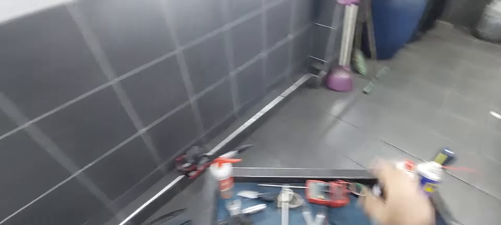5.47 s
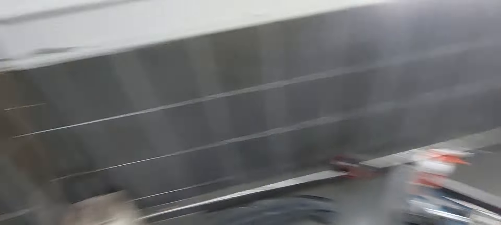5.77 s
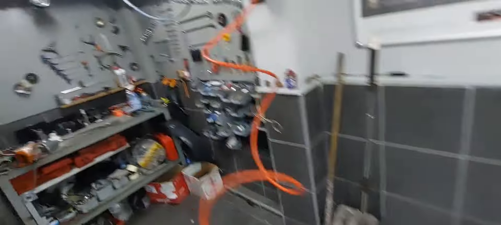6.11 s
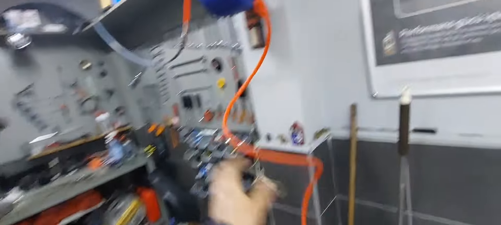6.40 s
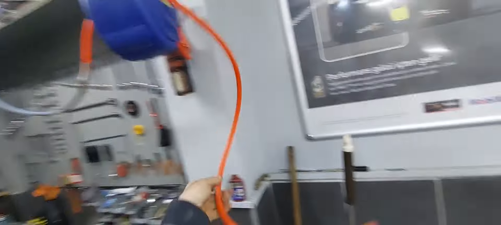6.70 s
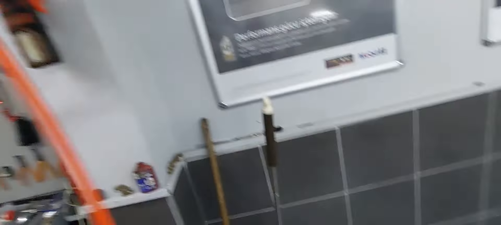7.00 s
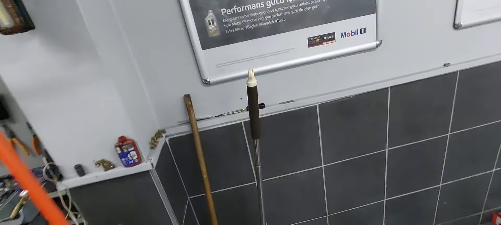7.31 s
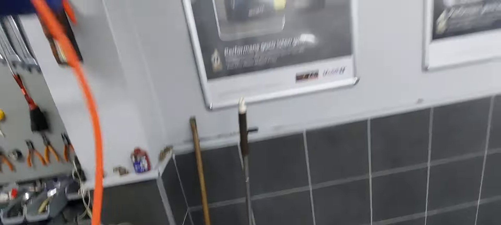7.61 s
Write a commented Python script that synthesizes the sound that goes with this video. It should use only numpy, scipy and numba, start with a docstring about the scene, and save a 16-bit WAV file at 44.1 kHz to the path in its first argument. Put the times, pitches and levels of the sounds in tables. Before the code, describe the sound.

Two loud blasts of compressed air in a workshop, followed by a hollow clank, hose bumps and a clattering hose reel.

```python
"""A loud hiss of air comes first: a blow gun sweeps an engine bay in two long blasts, close to a
hand-held microphone in a tiled workshop. The jet roars on the parts it hits, whistles past their
edges and makes their hollows sing. Then the gun drops on a tool trolley with a boom and a clank,
the air hose slides and knocks, and a wall reel winds it in with a clattering ratchet.
Underneath are a faint machine hum and the rumble of the microphone being carried."""
import sys
import numpy as np
from scipy import signal
from scipy.fft import rfft, irfft
from scipy.io import wavfile
from scipy.ndimage import uniform_filter1d
from numba import njit

SR = 44100
rng = np.random.default_rng(int(sys.argv[2]) if len(sys.argv) > 2 else 0)


def unload_audio(sound):
    """Save the sound as a 16-bit wav file, at the path given as the first command line argument."""
    columns = np.transpose(np.atleast_2d(sound))
    # keep every value between -1 and 1, then stretch to whole-number steps
    steps = np.round(np.clip(columns, -1, 1) * 32767)
    wavfile.write(sys.argv[1], SR, steps.astype(np.int16))


N = 346185
TIME = np.arange(N) / SR
FREQ = np.maximum(np.arange(N // 2 + 1) * SR / N, 1)

# how long the room's echo takes to fall by 60 dB: pitch_hz, fade_s
ECHO_FADE = [(100, 0.61), (300, 0.76), (1000, 0.57), (2500, 0.65), (4500, 0.59), (6500, 0.51), (9000, 0.48),
             (14000, .33)]
# tone of the quiet room air: pitch_hz, level_db
ROOM_AIR_TONE = [(15, -38), (25, -3.5), (59, 2), (87, -10), (120, -4), (145, -13.5), (384, -33.5),
                 (840, -39), (3340, -41), (5730, -33.5), (7710, -45.5), (11000, -38), (16000, -47)]
# machine hum: pitch_hz, level_db
MACHINE_HUM = [(59.2, -78), (118.4, -84), (177.6, -99)]
# tone of a faint hiss, perhaps air seeping from the coupling: pitch_hz, level_db
SEEP_TONE = [(300, -8), (900, -4.5), (1500, -7), (2150, -4), (3000, -9.5), (4700, -2.5), (6300, -4.5),
             (8000, -19.5), (11500, -14.5), (16000, -21.5)]
# loudness of that faint hiss: time_s, level_db
SEEP_LEVELS = [(3.95, -89.5), (4.15, -78), (4.3, -82), (4.8, -78.5), (5.15, -71), (7.85, -71.5)]
# tone of the moving microphone's rumble: pitch_hz, level_db
RUMBLE_TONE = [(15, -20.5), (33, -11.5), (47, 6), (65, -2.5), (100, -11), (250, -19), (600, -43),
               (3000, -92)]
# loudness of that rumble: time_s, level_db
RUMBLE_LEVELS = [(4.65, -81.5), (4.93, -62), (5.29, -53), (5.35, -43), (5.54, -63), (5.75, -39),
                 (5.92, -40.5), (6.2, -55), (6.9, -50), (7.15, -41.5), (7.85, -41)]
# soft bumps of the hand on the microphone: start_s, level_db
HAND_BUMPS = [(5.618, -33), (5.711, -20), (5.789, -33), (5.887, -28)]

# tone of the sliding hose: pitch_hz, level_db
HOSE_TONE = [(120, -1), (200, -4), (380, 1), (409, -3), (473, 6), (1040, -5), (2290, 1.5), (2470, -3.5),
             (5730, -2), (7830, -19.5), (11900, -11), (16000, -18)]
# slides of the hose: start_s, length_s, level_db
HOSE_SLIDES = [(5.693, 0.13, -56.5), (5.876, 0.041, -59), (6.238, 0.14, -51), (6.72, 0.14, -44),
               (6.96, 0.034, -41.5), (7.03, 0.019, -53), (7.08, 0.045, -57), (7.5, .15, -55)]
# knocks of hose and coupling: start_s, body_db, clack_db, tick_db
HOSE_KNOCKS = [(4.754, -59, -75, -95), (4.842, -47, -54.5, -67), (5.895, -50, -51, -55),
               (5.929, -45, -47, -42.5), (6.259, -26.5, -40.5, -58), (6.658, -49, -68, -67),
               (6.724, -40.5, -69, -73), (6.912, -32, -54, -43), (6.997, -31, -42, -42),
               (7.003, -20, -59, -47), (7.043, -34, -38, -39.5)]
# tone of the pawl, the catch that snaps over the ratchet's teeth: pitch_hz, level_db
PAWL_TONE = [(100, -30), (190, -21), (270, 7.5), (360, 2.5), (470, -12), (620, 7), (1000, -4), (2200, -4.5),
             (3500, -9.5), (6300, -5.5), (7800, -21), (10000, -16), (13000, -13), (16000, -26)]
# tone of the reel's scraping drum: pitch_hz, level_db
DRUM_TONE = [(100, -16), (180, -3.5), (280, 1.5), (450, 4), (650, -1), (1000, 0.5), (1600, 1.5),
             (2700, -2.5), (3800, -7), (5300, -6.5), (6600, -10.5), (8000, -20.5), (13000, -26),
             (16000, -28)]
# spins of the reel: start_s, length_s, start_teeth_per_s, speedup_teeth_per_s2, pawl_db, drum_db
REEL_SPINS = [(7.152, 0.16, 24.6, 468, -6.5, -34.5), (7.667, .2, 28, 90, -16.5, -23.5)]
# ringing notes of the trolley top and the gun's metal: pitch_hz, level_db, fade_s
TROLLEY_NOTES = [(134.2, -1.5, 0.5), (168.7, -3, 0.58), (318, -20, 1.5), (393, -1.5, 0.52),
                 (610, -9.5, 0.37), (2170, -39, 1.4), (2350, -42.5, 0.82), (3020, -18.5, 0.23),
                 (3100, -31, 0.75), (3300, -28, 0.32), (3940, -33.5, 0.83), (4200, -31, 0.37),
                 (5173, -43.5, 0.59), (6500, -20.5, 0.12)]
# tone of the gun's clank: pitch_hz, level_db
CLANK_TONE = [(300, -2), (700, 10), (1100, 1.5), (1500, -3), (3000, -6.5), (5000, -8.5), (6600, -12),
              (7400, -36), (9500, -39.5), (13000, -23.5), (16000, -32)]

# squeezes of the trigger: pressed_s, released_s
TRIGGER_PULLS = [(-.015, 2.218), (2.609, 3.492)]
# force of the jet, one list per blast: time_s, nozzle_hiss_db, edge_hiss_db
JET_LEVELS = [
    [(0.01, -24.5, -26.5), (0.04, -21.5, -22), (0.5, -24.5, -25.5), (0.85, -23.5, -26), (0.95, -28, -33.5),
     (1.04, -25, -25.5), (1.12, -25.5, -31.5), (1.18, -22, -23), (1.45, -22.5, -23.5), (1.51, -21.5, -18.5),
     (1.6, -26.5, -30.5), (1.81, -27.5, -29.5), (1.84, -25, -18.5), (1.87, -23, -28), (2.0, -27.5, -26.5),
     (2.21, -24.5, -31)],
    [(2.64, -25, -26), (2.87, -26.5, -31), (2.912, -21.5, -26), (3.016, -22.5, -21.5),
     (3.036, -23.5, -33.5), (3.136, -25.5, -30), (3.248, -25.5, -31.5), (3.296, -22.5, -19.5),
     (3.358, -23, -17.5), (3.406, -25.5, -25.5), (3.47, -25.5, -28)],
]
# tone of the air leaving the nozzle: pitch_hz, level_db
NOZZLE_TONE = [(500, -34), (2000, -15), (4000, -3), (6300, -3), (7300, -15.5), (8500, -8), (10000, -1.5),
               (12000, 4.5), (14000, 5.5), (16000, -2)]
# tone of the jet hitting a broad face: pitch_hz, level_db
ROAR_TONE = [(30, -35), (85, -27), (130, -4), (190, -10), (305, 0), (385, -3.5), (520, 3.5), (750, -1.5),
             (1200, 1.5), (1600, -1.5), (3000, -14), (8000, -43.5)]
# tone of the jet passing an edge: pitch_hz, level_db
EDGE_TONE = [(1500, -29.5), (3000, -11), (3900, -10.5), (5300, -4), (6400, -8), (7300, -15.5), (11000, -32)]
# larger faces roar deeper, gaining bass and losing as much treble: time_s, tilt_db
ROAR_DEPTH = [(.1, 0), (.55, -1.5), (.95, -1), (1.8, 2), (2.7, -2), (3.2, 1.5)]
# the jet crosses a hollow with a short "whoo": middle_s, half_length_s, level_db, pitch_hz
HOLLOW_CROSSINGS = [(0.044, 0.068, -23.5, 2300), (.23, 0.066, -20.5, 2000), (0.372, 0.038, -19.5, 1850),
                    (.48, 0.056, -20.5, 2100), (0.643, 0.034, -20, 2670), (0.764, 0.025, -20, 2220),
                    (1.02, 0.041, -25.5, 2395), (1.19, 0.051, -26, 2120), (1.303, 0.031, -25.5, 2695),
                    (1.457, 0.028, -34.5, 2770), (1.626, 0.096, -26, 2300), (1.823, 0.017, -23.5, 2420),
                    (2.01, 0.056, -24, 2270), (2.684, 0.039, -27.5, 1716), (2.813, 0.061, -20.5, 2880),
                    (2.975, 0.017, -21, 2500), (3.1, 0.02, -29, 2365), (3.361, .05, -28.5, 3150)]
# each hand stroke lands the jet on a face, then swings it off: landing_s, roar_db, roar_lost_db
HAND_STROKES = [(.02, -39.5, 3.5), (.21, -31, 5), (.4, -32.5, 2.5), (.57, -29.5, 4), (.745, -31, 13),
                (.96, -28, 11.5), (1.11, -26.5, 7.5), (1.285, -30.5, 8), (1.48, -33, 2.5), (1.59, -31, 5.5),
                (1.795, -31.5, 10), (2.02, -37, 3.5), (2.23, -31, 2.5), (2.64, -33.5, 2),
                (2.735, -24.5, 10), (2.87, -27.5, 4), (2.97, -35, 11), (3.14, -31.5, -1), (3.23, -35, 2),
                (3.45, -31, 11.5), (3.62, -30, 0)]


def undb(db):
    """Turn decibels into a number to multiply by."""
    return 10 ** (np.asarray(db) / 20)


def unit(x):
    """Scale a signal to an average strength (rms) of 1."""
    return x / np.sqrt(np.mean(x ** 2))


def curves(table):
    """Join each column's points into a line through time."""
    times, *columns = np.transpose(table)
    return [np.interp(TIME, times, column) for column in columns]


def at_pitch(points, hz):
    """Look up a table's value at any pitch, with octaves evenly spaced."""
    pitches, values = np.transpose(points)
    return np.interp(np.log(hz), np.log(pitches), values)


def colour(x, tone):
    """Shape a sound with a tone table, at strength 1."""
    return unit(irfft(rfft(x) * undb(at_pitch(tone, FREQ)), N))


def band(x, low_hz, high_hz):
    """Keep the sound between two pitches."""
    return signal.sosfilt(signal.butter(3, [low_hz, high_hz], "band", fs=SR, output="sos"), x)


def pan(x, left_db):
    """Make the left side left_db louder than the right."""
    return x * undb(np.array([[left_db], [-left_db]]) / 2)


def air_noise(apart_hz=1100, bass_side=0.14):
    """Stereo noise: long waves reach both sides of the microphone alike, short ones do not."""
    mid, side = rfft(rng.standard_normal((2, N)))
    side = side * np.clip(np.hypot(bass_side, FREQ / apart_hz), 0, 1)
    return irfft(np.array([mid + side, mid - side]), N)


def wobble(rate_hz):
    """A smooth random wander of strength 1."""
    step = max(int(SR / rate_hz), 1)
    stairs = np.repeat(rng.standard_normal(N // step + 1), step)
    return unit(uniform_filter1d(stairs, step)[:N])


def fade(t, fade_s):
    """Start at t = 0 and die away by 60 dB in fade_s."""
    return (t >= 0) * np.exp(-np.log(1000) * np.clip(t / fade_s, 0, 2))


def strikes(times, levels_db, fade_s, contact_s=0.00053):
    """Loudness of a row of blows: each builds while the contact lasts, then dies away."""
    loudness = np.zeros(N)
    t = TIME[:SR // 2]
    blow = np.clip(t / contact_s, 0, 1) * fade(np.maximum(t - contact_s, 0), fade_s)
    for start_s, db in zip(times, levels_db):
        start = min(int(start_s * SR), N)
        loudness[start:start + len(t)] += undb(db) * blow[:N - start]
    return loudness


def workshop(size=SR):
    """The tiled room's answer to a click: dense echoes after a short gap, the treble dying first."""
    hz, times, echoes = signal.stft(air_noise()[:, :size], SR, nperseg=256)
    echoes = echoes * fade(times, at_pitch(ECHO_FADE, hz + 1)[:, None])
    tail = signal.istft(echoes, SR)[1][:, :size]
    onset = np.clip((TIME[:size] - 0.003) / 0.002, 0, 1)
    return unit(tail * onset) / np.sqrt(size)


def in_room(x, room, echo_db):
    """A sound plus its echo from the room."""
    return x + undb(echo_db) * signal.fftconvolve(np.atleast_2d(x), room, axes=1)[:, :N]


def background():
    """Quiet room air with a faint machine hum and a thin hiss."""
    hum = sum(np.sqrt(2) * undb(db) * np.sin(2 * np.pi * (hz * TIME + rng.random()))
              for hz, db in MACHINE_HUM)
    seep_db, = curves(SEEP_LEVELS)
    seep = colour(air_noise(), SEEP_TONE) * undb(seep_db + 1.2 * wobble(12))
    room_air = colour(air_noise(), ROOM_AIR_TONE) * undb(-70 + 0.8 * wobble(0.73))
    return room_air + undb(-0.5) * hum + seep


def handling():
    """The carried microphone rumbles and takes a few soft bumps."""
    rumble_db, = curves(RUMBLE_LEVELS)
    times, bump_db = np.transpose(HAND_BUMPS)
    rumble = colour(air_noise(bass_side=0.34), RUMBLE_TONE) * undb(rumble_db - 1.5)
    bumps = band(air_noise(bass_side=0.9) * strikes(times, bump_db + 17.5, fade_s=0.14), 51, 142)
    return rumble + bumps


def sliding_hose(room, grip_db=1.5, swell_s=0.085):
    """The hose drags in small catches and slips; each slide swells and runs out."""
    slides = np.zeros(N)
    for start_s, length_s, db in HOSE_SLIDES:
        t = TIME - start_s
        swell = np.clip(np.minimum(t, length_s) / swell_s, 0, 1)
        slides += undb(db) * swell * fade(np.maximum(t - length_s, 0), fade_s=0.61)
    drag = colour(air_noise(), HOSE_TONE) * slides * undb(2.5 + grip_db * wobble(100))
    return in_room(drag, room, echo_db=-8)


def knocks(room):
    """Hose and coupling bump into things, each blow a mix of low body, clack and high tick."""
    times, body_db, clack_db, tick_db = np.transpose(HOSE_KNOCKS)
    body = band(air_noise() * strikes(times, body_db + 12.5, fade_s=0.1), 148, 371)
    clack = band(air_noise() * strikes(times, clack_db + 19.5, fade_s=0.023), 410, 1380)
    tick = band(air_noise() * strikes(times, tick_db + 7.5, fade_s=0.022, contact_s=0.0022), 1700, 4800)
    return in_room(body + clack + tick, room, echo_db=1.0)


def reel_spin(start_s, length_s, rate, speedup, pawl_db, drum_db):
    """A spring speeds the drum up evenly: gives snap times, snap levels and the scrape's loudness."""
    tooth = np.arange(int(rate * length_s + speedup * length_s ** 2 / 2) + 1)
    snap_s = start_s + (np.sqrt(rate ** 2 + 2 * speedup * tooth) - rate) / speedup
    snap_db = pawl_db - 0.28 * tooth  # ever softer, as the pawl has less time to drop
    t = TIME - start_s
    slack_s, reference_teeth_per_s = 0.032, 52.6
    starting = np.clip((t + slack_s) / (2 * slack_s), 0, 1)  # takes up slack before the first tooth
    stopping = fade(np.maximum(t - length_s, 0), fade_s=0.37)
    speed = (rate + speedup * np.clip(t, 0, length_s)) * stopping * starting
    return snap_s, snap_db, undb(drum_db) * (speed / reference_teeth_per_s) ** 1.07


def wall_reel(room, scrape_flutter_db=3, right_lag_s=0.00045):
    """The pawl snaps over the teeth ever faster and shakes the housing, while the drum scrapes round."""
    snap_s, snap_db, scrapes = zip(*(reel_spin(*spin) for spin in REEL_SPINS))
    snap_s, snap_db = np.concatenate(snap_s), np.concatenate(snap_db)
    snaps = strikes(snap_s, snap_db - 7, fade_s=0.03, contact_s=0.0011)
    bounces = strikes(snap_s + 0.0034, snap_db - 12, fade_s=0.023)  # one after each tooth
    pawl = colour(air_noise(apart_hz=3160), PAWL_TONE) * (snaps + bounces)
    drum = colour(air_noise(apart_hz=3030), DRUM_TONE) * sum(scrapes)
    left, right = pawl + drum * undb(scrape_flutter_db * wobble(250))
    right = np.interp(TIME - right_lag_s, TIME, right)  # the sound reaches the left side first
    return pan(in_room(np.array([left, right]), room, echo_db=-2.5), left_db=0.5)


def dropped_gun(room, drop_s=5.3265, thud_hz=245, swell_s=0.0038, metal_lag_s=0.0042):
    """The gun lands on the trolley: the top booms, then top and metal ring on."""
    since_drop = TIME - drop_s
    t = np.maximum(since_drop, 0)
    thud = (t / swell_s * np.exp(1 - t / swell_s)) ** 2 * np.cos(2 * np.pi * thud_hz * t)
    ring = sum(undb(db) * fade(t, fade_s) * np.sin(2 * np.pi * hz * t)
               for hz, db, fade_s in TROLLEY_NOTES)
    boom = band(air_noise(apart_hz=1800, bass_side=0.1) * fade(since_drop, 0.5), 130, 350)
    knock = band(air_noise() * fade(since_drop, 0.055), 386, 640)
    clank = colour(air_noise(), CLANK_TONE) * fade(since_drop - metal_lag_s, 0.063)
    hit = in_room(undb(-1.5) * thud + undb(2.5) * knock, room, echo_db=-10.5)
    top = hit + undb(2.5) * boom + undb(-22) * ring
    return band(top, 105, 9000) + in_room(undb(-33) * clank, room, echo_db=8.5)


def engine_bay(x, echo=0.11, sway=0.086):
    """Nearby metal faces bounce the sound back; the paths shift as the nozzle is waved about."""
    out = x.copy()
    for channel in range(2):
        for lag_s in (0.0011, 0.0023, 0.0041):
            late_s = lag_s * (1 + sway * wobble(5))
            out[channel] += echo * np.interp(TIME - late_s, TIME, x[channel])
    return out


def wagging_hand():
    """The hand wags the nozzle: gives the roar's level and the dB lost as the jet swings off a face."""
    landing_s, roar_db, lost_db = np.transpose(HAND_STROKES)
    stroke = np.interp(TIME, landing_s, np.arange(len(landing_s)))
    swing_db = lost_db[stroke.astype(int)] * np.sin(np.pi * stroke) ** 2
    return np.interp(TIME, landing_s, roar_db), swing_db


def face_roar(pivot_hz=800):
    """The jet roars on a broad face; the larger the face, the deeper the roar."""
    tilt_db, = curves(ROAR_DEPTH)
    roar = colour(air_noise(apart_hz=1585), ROAR_TONE)
    bass = irfft(rfft(roar) / (1 + (FREQ / pivot_hz) ** 4), N)
    return bass * undb(tilt_db) + (roar - bass) * undb(-tilt_db)


@njit
def resonance(x, hz, width_hz):
    """A filter that keeps the sound near a moving pitch."""
    out, band_state, low_state = np.empty(len(x)), 0., 0.
    for i in range(len(x)):
        tuning, damping = np.tan(np.pi * hz[i] / SR), width_hz / hz[i]
        ring = (band_state + tuning * (x[i] - low_state)) / (1 + tuning * (tuning + damping))
        band_state = 2 * ring - band_state
        low_state += 2 * tuning * ring
        out[i] = damping * ring
    return out


def hollow_tone(air, hz, width_hz):
    """A hollow picks its own pitch out of the rushing air."""
    return unit(np.array([resonance(resonance(side, hz, width_hz), hz, width_hz) for side in air]))


def hollows(hiss_db, buffet, gaps_db=-9.5, gaps_hz=2330):
    """Each hollow swells as the jet crosses it, over small gaps that sound all the time."""
    powers, pitches = [undb(hiss_db + gaps_db) ** 2], [gaps_hz]
    for middle_s, half_s, db, hz in HOLLOW_CROSSINGS:
        swell = np.exp(-np.minimum(((TIME - middle_s) / half_s) ** 2, 20))
        powers.append(undb(db) ** 2 * swell)
        pitches.append(hz)
    level_db = 10 * np.log10(sum(powers))
    pitch_hz = sum(power * hz for power, hz in zip(powers, pitches)) / sum(powers)  # the loudest leads
    pitch_hz *= 1 + 0.05 * wobble(40)
    broad = hollow_tone(air_noise(apart_hz=3500), pitch_hz, width_hz=2300.0)
    narrow = hollow_tone(air_noise(apart_hz=3508), pitch_hz, width_hz=650.0)
    singing = undb(-13.5 + 0.8 * (level_db - np.median(level_db)))  # a square hit almost whistles
    whoo = (broad + singing * narrow) / np.hypot(1, singing)
    return whoo * undb(level_db - 0.96 + 1.1 * buffet + 1.8 * wobble(220))


def blow_gun(room, open_s=0.028, close_s=0.02):
    """The free jet hisses; where it lands it roars, whistles past edges and sounds the hollows."""
    hiss_db, edge_db = curves(np.vstack(JET_LEVELS))
    roar_db, swing_db = wagging_hand()  # swinging off a face trades roar for a little more hiss
    valve = sum(np.clip((TIME - on) / open_s, 0, 1) ** 2 * np.clip((off - TIME) / close_s + 1, 0, 1)
                for on, off in TRIGGER_PULLS)
    buffet = wobble(70)  # the swirling air flaps against the parts
    hiss = colour(air_noise(), NOZZLE_TONE) * undb(hiss_db + 3 + 0.06 * swing_db + wobble(40))
    roar = face_roar() * undb(roar_db + 1.91 - swing_db + 0.5 * buffet)
    edge = colour(air_noise(apart_hz=6050), EDGE_TONE)
    edge *= undb(edge_db - 0.1 + 0.081 * swing_db + 1.8 * wobble(60))
    parts = roar + pan(edge, left_db=3.5) + hollows(hiss_db, buffet)
    nozzle = in_room(engine_bay(valve * hiss), room, echo_db=-7)
    landing = in_room(engine_bay(valve * parts), room, echo_db=-4.5)
    return pan(nozzle, left_db=-2.5) + pan(landing, left_db=-0.83)


def scene():
    """All the sounds together in one workshop."""
    room = workshop()
    tools = blow_gun(room) + dropped_gun(room) + knocks(room) + sliding_hose(room) + wall_reel(room)
    return tools + handling() + background()


def record(dry, top_hz=16200):
    """Hold the peaks at full scale and cut the highest treble."""
    treble_cut = signal.ellip(14, 0.1, 90, top_hz, fs=SR, output="sos")
    return signal.sosfilt(treble_cut, np.clip(dry, -1, 1))


dry = scene()
out = record(dry)
unload_audio(out)
```